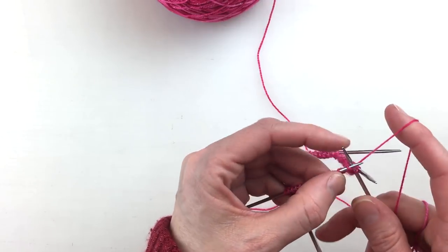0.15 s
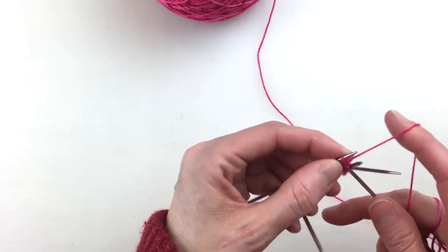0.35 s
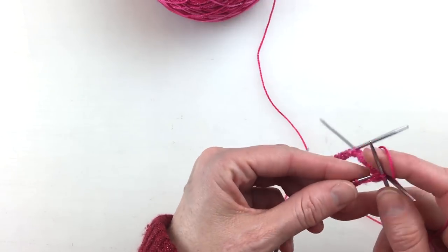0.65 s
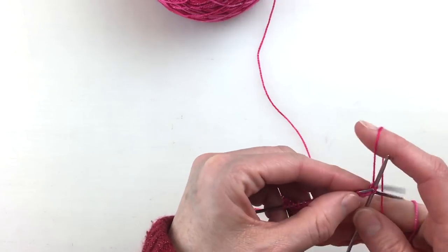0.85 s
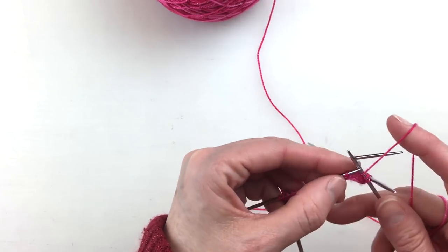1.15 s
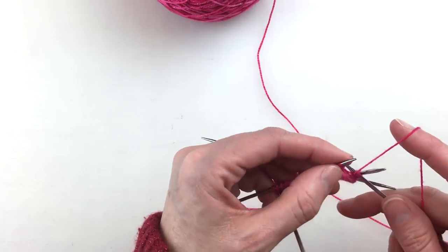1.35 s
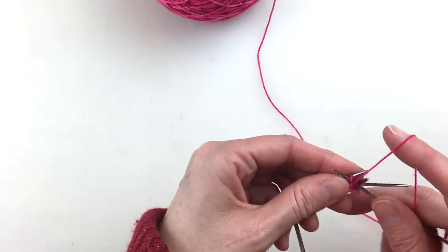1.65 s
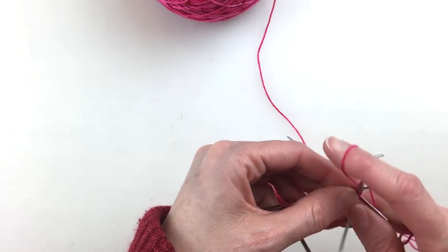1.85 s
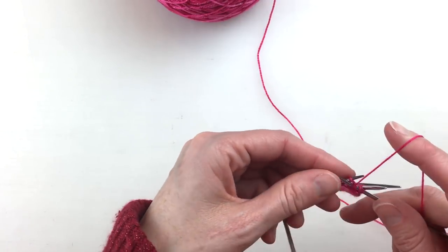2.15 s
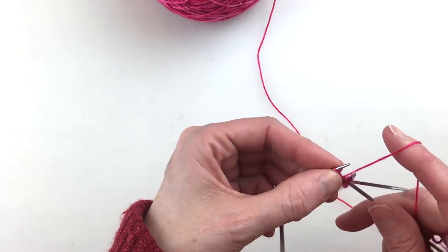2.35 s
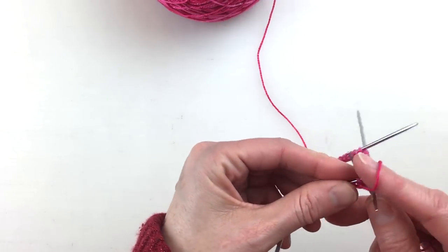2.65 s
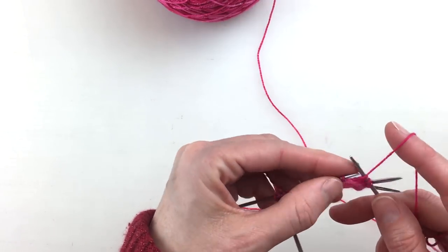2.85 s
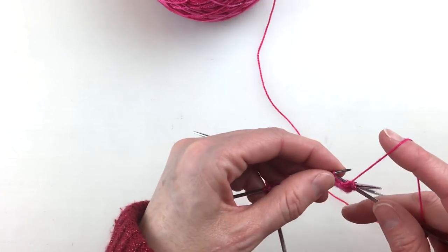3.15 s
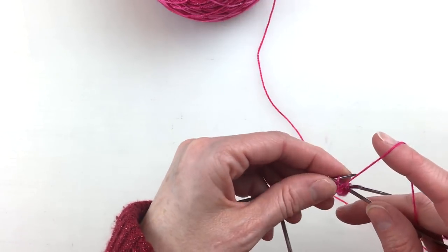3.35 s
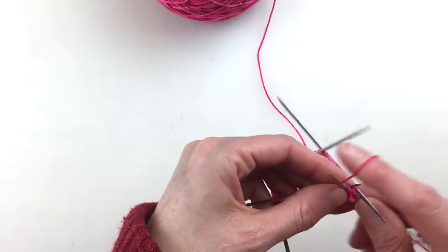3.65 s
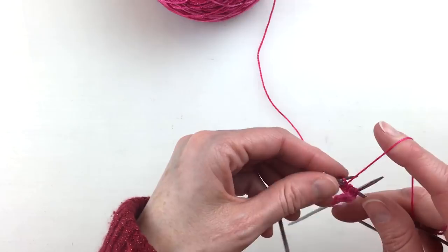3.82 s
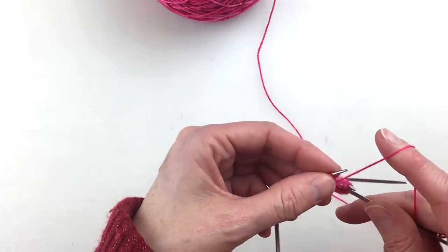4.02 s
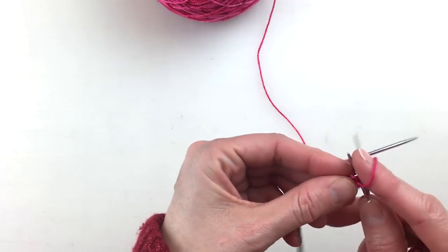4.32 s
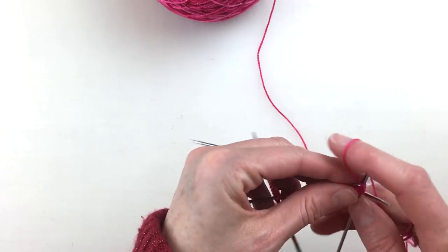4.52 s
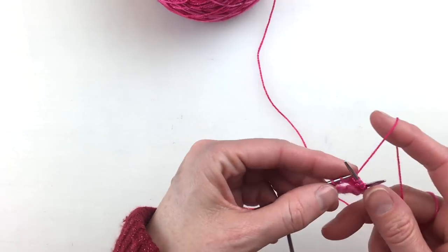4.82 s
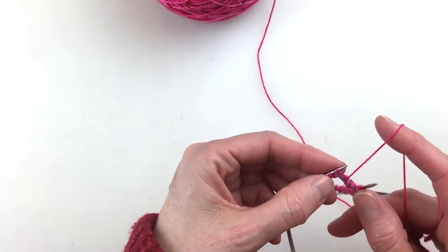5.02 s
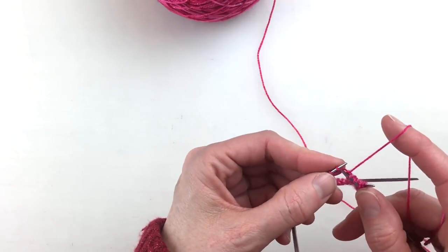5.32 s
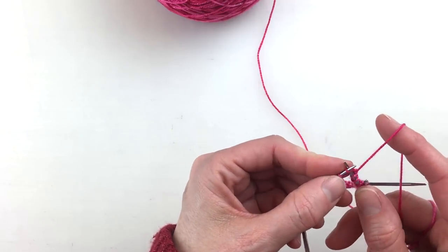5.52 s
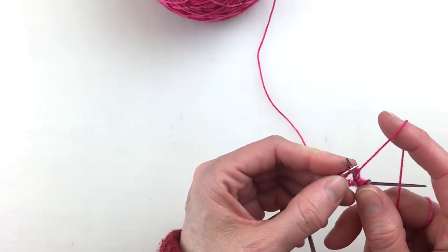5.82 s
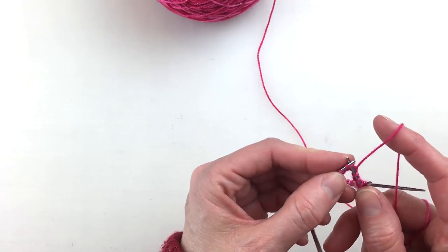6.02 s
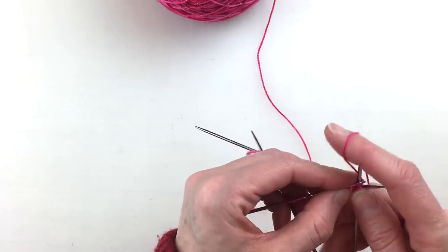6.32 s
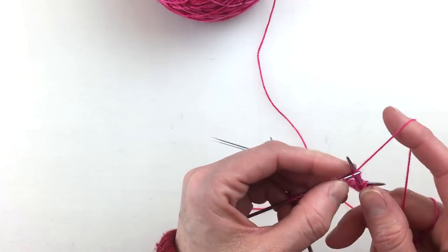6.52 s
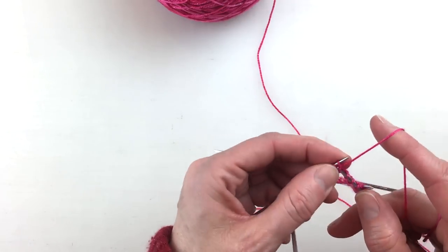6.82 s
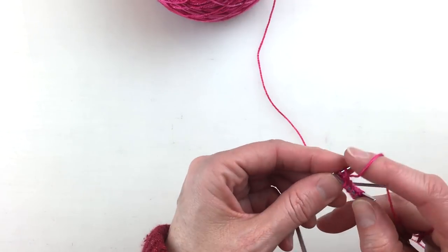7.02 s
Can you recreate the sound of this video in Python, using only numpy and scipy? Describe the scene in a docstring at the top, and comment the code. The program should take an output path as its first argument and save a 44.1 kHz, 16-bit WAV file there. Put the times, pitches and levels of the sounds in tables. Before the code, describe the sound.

A dull little hand brush starts it, then delicate metal needle taps and whispery wool strokes continue close to the microphone, with a very short room tail. A wavering low engine drone in the distance builds early, holds until about three seconds, then drops away, leaving a faint rumble and hiss. Clicks cluster just before three seconds and after four, thinning toward the end.

```python
"""A low hum over a soft rumble, like a distant engine going by: it swells, sinks in pitch, then fades as it creeps up.
Drones are wavering sines; rumble, roar and hiss are shaped noise. A hand's grip shifts in one dull brush at the start.
Up close, thin steel needles knit wool: yarn is pulled along the steel in short strokes of rustling noise.
The needles tap, some rebound, and noise bursts excite their bending modes: square contacts ring, glancing ones
give a dry tick. A loosely held needle rings on as a dying sine, and a short room tail follows."""
import sys
import numpy as np
from scipy import signal
from scipy.fft import rfft, irfft, next_fast_len
from scipy.io import wavfile
from scipy.ndimage import map_coordinates

SR = 44100
rng = np.random.default_rng(int(sys.argv[2]) if len(sys.argv) > 2 else 0)


def wav_out(sig):
    """Save sig, one row per channel (or a flat mono array), as 16-bit PCM at SR to the path in sys.argv[1]."""
    wavfile.write(sys.argv[1], SR, np.round(np.clip(np.atleast_2d(sig).T, -1, 1) * 32767).astype(np.int16))


N = 316197  # samples, about 7.17 s


def amp(db):
    """Amplitude factor of a level in dB."""
    return 10 ** (np.asarray(db) / 20)


def unit(x):
    """x at rms 1."""
    return x / np.sqrt(np.mean(x ** 2) + 1e-30)


def curves(rows):
    """One value per sample for each column after the time."""
    knots_s, *columns = np.transpose(rows)
    t = np.arange(N) / SR
    return [np.interp(t, knots_s, column) for column in columns]


def wobble(rate):
    """A smooth random curve, rate knots a second."""
    knots = rng.standard_normal(int(N * rate / SR) + 4)
    return map_coordinates(knots, [np.arange(N) * rate / SR])


def filtered(x, response):
    """x times a complex response of frequency."""
    m = next_fast_len(len(x) + 2048)  # zero padding leaves space for the filter's tail
    hz = np.fft.rfftfreq(m, 1 / SR)
    return irfft(rfft(x, m) * response(hz), m)[:len(x)]


def coloured(x, spectrum):
    """x shaped by (Hz, dB) points, at rms 1."""
    points_hz, points_db = np.transpose(spectrum)

    def colour(hz):
        return amp(np.interp(np.log(hz + 1), np.log(points_hz), points_db))

    return unit(filtered(x, colour))


def noise(spectrum):
    """Steady noise of that colour, at rms 1."""
    return coloured(rng.standard_normal(N), spectrum)


# colour of the faint even hiss: frequency_hz, density_db (per Hz, relative)
HISS_COLOUR = [(300, 1), (2000, 6), (2800, 1), (4000, 2.5), (4900, -2), (6000, 0), (9400, -3.5),
               (10500, -7.5), (12000, -3.5), (15700, -8)]


def hiss():
    """Steady shaped noise at the bottom of the mix."""
    return amp(-76.0) * noise(HISS_COLOUR)


def off_table(x, delay_s=0.00322, echo_db=-15):
    """Room sound arrives once more off the table top, which ripples its spectrum."""
    return filtered(x, lambda hz: 1 + amp(echo_db) * np.exp(-2j * np.pi * hz * delay_s))


# colour of the distant rumble: frequency_hz, density_db (per Hz, relative)
RUMBLE_COLOUR = [(15, -47.5), (29, -23.5), (42, -7), (55, -10.5), (67, -6.5), (85, -1), (102, 4), (135, -3),
                 (165, -6), (200, -7.5), (225, -15.5), (330, -27.5), (500, -53)]
# colour of the soft roar above it: frequency_hz, density_db (per Hz, relative)
ROAR_COLOUR = [(120, -9), (260, 4), (340, 2), (440, 1), (660, 0.5), (950, -2), (1300, -7.5), (1550, -8),
               (1850, -17.5), (2800, -33), (6000, -35.5)]
# level of the distant noise: time_s, rumble_db, roar_db
DISTANT_LEVELS = [(0, -53.5, -65.5), (.45, -57, -67), (1.3, -52, -63), (1.8, -56.5, -63.5),
                  (2.55, -50, -66.5), (3.15, -54, -63.5), (3.8, -56.5, -66.5), (4.8, -56, -68),
                  (5.9, -57.5, -68.5), (6.7, -59.5, -68.3), (7.17, -60, -69.3)]


def distant_noise():
    """A bed of low rumble and soft roar; the roar wavers slightly and is reflected by the table."""
    rumble_db, roar_db = curves(DISTANT_LEVELS)
    rumble = amp(rumble_db) * noise(RUMBLE_COLOUR)
    roar = amp(roar_db + 0.4 * wobble(8)) * unit(off_table(noise(ROAR_COLOUR)))
    return rumble + roar


def tone(hz, waver_db, drift_hz):
    """A sine of rms 1 that wavers in level and pitch on its long way through the air."""
    phase = 2 * np.pi * np.cumsum(hz + drift_hz * wobble(9)) / SR
    return unit(np.sin(phase) * amp(waver_db * wobble(14)))


# drones that come and go by themselves: time_s, low_db, middle_db, high_db
FREE_DRONE_LEVELS = [(0, -58, -72, -73), (.3, -63, -60.5, -73), (1.15, -61, -59, -77), (1.5, -59, -55, -56),
                     (2, -57, -68, -67.5), (2.4, -52.5, -69, -57), (3.3, -57.5, -84, -65),
                     (3.85, -64, -85, -74), (4.7, -58, -90, -69.5), (5.5, -63, -87, -71.5),
                     (6, -56.5, -93, -72.5), (6.5, -68, -80, -71), (7.17, -60, -84, -77)]


def free_drones():
    """Three wavering sines, each with its own level curve."""
    low_db, middle_db, high_db = curves(FREE_DRONE_LEVELS)
    low = amp(low_db) * tone(77.34, waver_db=1.5, drift_hz=2.52)
    middle = amp(middle_db) * tone(149, waver_db=1.5, drift_hz=0.99)
    high = amp(high_db) * tone(203.1, waver_db=0.3, drift_hz=1.77)
    return low + middle + high


# the engine's main note: time_s, pitch_hz
HUM_PITCH = [(0, 126), (1, 123.6), (2, 122), (3, 119.2), (4, 116.7), (5, 112.5), (5.7, 114.4),
             (7.17, 121.9)]
# the engine's strength, before a 2 dB trim of the main note: time_s, level_db
HUM_LEVEL = [(0, -48.5), (.2, -56), (.6, -48), (1.1, -42), (1.2, -39), (1.4, -40.5), (2.9, -39),
             (3.27, -47.5), (3.42, -43.5), (3.75, -48.5), (4.25, -52.5), (4.5, -50.5), (4.95, -53.5),
             (5.15, -59.5), (5.7, -57), (6.3, -64.5), (7.17, -60)]
# drones that rise and sink with the main note's level: pitch_hz, level_db (at the engine's loudest),
# follow_db_per_db (of the main note), waver_db (random both ways, so its sign is free), drift_hz
FOLLOWING_DRONES = [(58.8, -67.5, 0.35, -2.5, 1.5), (309.5, -75, 2, 1, 2)]


def engine_hum():
    """A main note that glides in pitch, with weaker drones that follow its level."""
    pitch_hz, = curves(HUM_PITCH)
    hum_db, = curves(HUM_LEVEL)
    fade_db = hum_db - hum_db.max()
    out = amp(hum_db - 2.0) * tone(pitch_hz, waver_db=0.7, drift_hz=.43)
    for hz, db, follow, waver_db, drift_hz in FOLLOWING_DRONES:
        out += amp(db + follow * fade_db) * tone(hz, waver_db, drift_hz)
    return out


def scuff(start_s=0.0021, length_s=0.09, db=-65):
    """A hand shifts its grip with one soft, dull brush: a quick swell and a slower fall of noise."""
    progress = np.clip((np.arange(N) / SR - start_s) / length_s, 0, 1)
    swell = np.sin(np.pi * np.sqrt(progress))
    # frequency_hz, density_db (per Hz, relative)
    return amp(db) * swell * noise([(300, -12), (1100, 3), (1800, -4), (2600, -18), (8000, -32)])


# the needles' bending modes: frequency_hz, width_hz, level_db, grip_share (of the grip shift, 0-1)
NEEDLE_MODES = [(2290, 110, 5, 0.16), (3570, 54, -9.5, 0.11), (5470, 150, 4, 0.88),
                (6020, 710, -11.5, 0.94), (7256, 110, -1.5, 0.16), (9170, 88, -9.5, 0.14),
                (9780, 130, -4.5, .2), (12380, 490, -8, 0.3), (14450, 290, -12, 0.26),
                (15560, 140, -4, 0.3)]


def steel(hz, grip_hz, scatter_hz):
    """Response of the needles; the grip and the changing point of support shift their modes."""
    response = 0
    for mode_hz, width_hz, db, share in NEEDLE_MODES:
        f = mode_hz + share * grip_hz + scatter_hz * rng.standard_normal()
        damping = 1j * hz * width_hz
        response = response + amp(db) * damping / (f * f - hz * hz + damping)
    return response


# pulls of yarn along the needles: peak_s, length_s, level_db (at the peak)
YARN_STROKES = [(0, 0.033, -69.5), (0.098, 0.1, -74), (.41, 0.033, -71), (0.478, 0.059, -72),
                (0.588, .08, -69.5), (.695, 0.12, -70.5), (.885, 0.087, -74.5), (1, .06, -72.5),
                (1.225, .08, -76), (1.438, .04, -75), (1.533, 0.055, -75), (1.8, 0.074, -71.5),
                (1.87, .07, -72.5), (2.05, 0.14, -71), (2.222, 0.059, -68.5), (2.402, 0.036, -70.5),
                (2.489, .04, -77), (2.695, 0.22, -75.5), (2.899, .14, -76), (3.543, 0.11, -73.5),
                (3.62, 0.079, -74.5), (3.787, 0.15, -73), (3.934, 0.049, -67.5), (4.14, 0.071, -71),
                (4.453, 0.14, -72), (4.616, .15, -73.5), (4.864, 0.28, -77.5), (5.979, 0.055, -80),
                (6.355, .08, -72), (6.464, 0.22, -78), (6.922, 0.17, -76.5)]


def sliding():
    """How hard the yarn rubs: each pull speeds up and slows down again."""
    rise_share, edge_db, shape = 0.46, 8, 1.6  # part spent speeding up, drop at the ends, roundness of the top
    t = np.arange(N) / SR
    power = np.full(N, amp(-88) ** 2)  # the wool never lies quite still
    for peak_s, length_s, db in YARN_STROKES:
        near = np.abs(t - peak_s) < 2 * length_s
        u = (t[near] - peak_s) / length_s
        away = np.maximum(-u / rise_share, u / (1 - rise_share))  # 0 at the peak, 1 at the ends
        power[near] += amp(db - edge_db * away ** shape) ** 2
    return np.sqrt(power)


# colour of the rubbing wool: frequency_hz, density_db (per Hz, relative)
WOOL_COLOUR = [(800, -35), (2200, -5.5), (3500, 1.5), (4900, -2), (5500, 1), (7000, 4), (7600, 0.5),
               (9200, 6), (10000, 2), (10500, -8), (11000, 3), (12200, 0), (13500, 2), (15600, -9.5)]


def yarn(catch_db=1.0, ring_db=-12, snag_db=-6, snags_per_s=160):
    """Fibres catch and slip in a fine rustle, which faintly rings the needles; some snag with a tiny tick."""
    fibres = rng.standard_normal(N) * amp(catch_db * wobble(700) + 2.3 * wobble(90))
    snags = unit((rng.random(N) < snags_per_s / SR) * rng.standard_normal(N))
    rustle = filtered(fibres + amp(snag_db) * snags, lambda hz: 1 + amp(ring_db) * steel(hz, 0, 0))
    return sliding() * coloured(rustle, WOOL_COLOUR)


# a loosely held needle rings on after a tap: start_s, pitch_hz, peak_db, t60_s
LOOSE_RINGS = [(.682, 2190, -60.5, 0.12), (.682, 3570, -67, 0.072), (.682, 5230, -67, .045),
               (1.7995, 3580, -66.5, 0.069), (2.9925, 5324, -65, .049), (4.1535, 2080, -54, .035),
               (4.445, 2100, -62, .04), (4.674, 5380, -66, .07), (5.9975, 4324, -64, 0.013),
               (6.916, 3600, -70, 0.07)]


def pings():
    """A needle that the fingers do not damp keeps its modes sounding as dying sines."""
    t = np.arange(SR // 8) / SR
    out = np.zeros(N + len(t))
    for start_s, hz, db, t60_s in LOOSE_RINGS:
        out[int(start_s * SR):][:len(t)] += amp(db - 60 * t / t60_s) * np.sin(2 * np.pi * hz * t)
    return out[:N]


# needle contacts: start_s, level_db (middle register, as if its energy filled 5 ms),
# top_db (top register relative to the middle), glancing (0 square - 1 glancing), chatter_t60_s,
# favoured_hz (strongest upper ring), grip_hz (shift of the modes), rebound (amplitude share, 0-1)
NEEDLE_TAPS = [(0.0872, -69.5, 0, 0.5, .026, 15400, 220, 0),
               (.4752, -62.5, -1, 0.24, 0.011, 15330, -110, .5),
               (0.6818, -58.5, 5.5, 0.45, 0.0047, 15100, -100, .35),
               (0.703, -68, 7, 0.4, .025, 15000, -40, 0), (.934, -63, 1, .1, 0.011, 12100, -70, 0.4),
               (1.0434, -65.5, 5.5, 0.3, 0.026, 9690, 140, 0.05),
               (1.106, -65.5, 3, .25, 0.018, 12300, -90, .4), (1.252, -65.5, 3.5, 1, 0.0037, 8700, -20, 0),
               (1.3005, -70, -3, 0.3, .026, 9780, 0, 0.07), (1.3762, -67, 9, .95, .0057, 12200, -20, 0),
               (1.4818, -74, 5, .3, .012, 12380, 190, 0), (1.599, -59.5, -9, 0.22, 0.022, 9480, 60, 0.83),
               (1.6679, -70, -6, .3, .012, 9070, 120, 0), (1.76, -59.5, -4, 0.3, 0.0074, 10000, 143, 0.06),
               (1.799, -72, 11, .6, .012, 12380, -170, 0), (2.0933, -67.5, -8, .25, 0.033, 8460, 130, 0),
               (2.246, -66.5, 2, 1, .0043, 9020, 150, 0.6), (2.4098, -63, -6, 0.02, 0.016, 9970, 170, 0),
               (2.5475, -56.5, -2, 0.22, 0.023, 9730, 130, 0), (2.69, -67, -12, 0.8, .02, 11930, -80, 0),
               (2.6996, -64, 4.5, .45, 0.02, 10210, 60, 0), (2.7166, -67, 3, 0.33, .026, 9800, 290, 0),
               (2.7265, -58, 5, 0, 0.02, 9600, 90, .55), (2.7368, -63.5, -1, 0, 0.051, 9500, 70, 0.02),
               (2.9922, -56, 4.5, 0, 0.0097, 11940, -150, 0), (3.019, -60.5, 2.5, 0, .022, 12870, 150, 0.6),
               (3.314, -62.5, 0, 0.25, .028, 12200, -90, 0.02),
               (3.4658, -65, -2, 0.12, 0.02, 12420, 240, 0.01),
               (3.8021, -69.5, 5, .8, 0.012, 14730, 144, 0.29),
               (3.8363, -56.5, 5.5, 0.16, .014, 12360, 0, 0.36),
               (3.9162, -61.5, 0, .6, 0.021, 12550, 50, 0), (4.0855, -71, -12, .4, .014, 15350, 170, 0.01),
               (4.153, -51, -2, 0.06, 0.014, 14450, 0, 0.1),
               (4.2963, -55.5, -3.5, .12, 0.015, 12400, 38, 0.22),
               (4.3943, -67, 1, 0.56, 0.016, 9090, -100, 0), (4.409, -74, 5, 0, 0.019, 9860, 220, .9),
               (4.444, -61.5, 5.5, 0, 0.023, 12000, 150, 0.67),
               (4.6733, -61.5, 0, 0.32, 0.019, 11830, -130, 0),
               (4.743, -69, 11.5, 0.83, 0.011, 9900, 100, 0.05),
               (4.787, -64.5, 5.5, 0.8, 0.018, 9200, 240, 0), (4.8374, -69.5, 10, .85, 0.028, 12640, 52, 0),
               (4.8766, -68.5, 7, 0.82, .011, 15570, 110, 0),
               (5.0854, -68.5, 9.5, .95, 0.0046, 11370, 110, 0),
               (5.1205, -72, -4, .15, 0.016, 15300, 190, 0.05),
               (5.161, -65, 9, 0.48, .015, 15600, 200, 0.24), (5.7264, -62, 1, 0.2, 0.014, 12400, 40, 0.12),
               (5.9969, -62.5, 2, 0.89, 0.0058, 8880, 140, 0), (6.3607, -65.5, 6, 0.13, .013, 10050, 73, 0),
               (6.452, -65.5, 3.5, 0.34, .027, 11980, 180, 0), (6.71, -67, 8.5, 1, .0048, 13740, 100, 0.02),
               (6.754, -70, 6, .7, 0.004, 12560, 340, 0.04), (6.9158, -72.5, 8, .35, .023, 12360, 110, .5)]


def contacts():
    """Every tap, and its weaker second landing 6.3 ms later if it bounces."""
    for start_s, db, *manner, rebound in NEEDLE_TAPS:
        yield start_s, db, *manner
        if rebound > 0:
            yield start_s + .0063, db + 20 * np.log10(rebound), *manner


def taps(snap_db=16.0, scatter_hz=50, favour_db=6, favour_width_hz=330):
    """Each contact is a snap and a dying chatter of steel on steel; where it lands decides which modes ring."""
    edges_hz = [(1850, 2650), (2900, 8500), (8500, 15700)]  # lowest mode, middle, top
    registers = [signal.butter(3, edges, 'band', fs=SR, output='sos') for edges in edges_hz]
    t = np.arange(SR // 20) / SR
    out = np.zeros(N + len(t))
    for start_s, db, top_db, glancing, t60_s, favoured_hz, grip_hz in contacts():
        # a square blow reaches the lowest mode, a glancing one is mostly dry crack
        low_db = np.interp(glancing, [0, 1], [-2.5, -22.5])
        crack_db = np.interp(glancing, [0, 1], [-22, 1.5])
        chatter = rng.standard_normal(len(t)) * amp(-60 * t / t60_s) * (1 - np.exp(-t / 0.00034))
        snap = amp(snap_db) * (t == 0)  # a single-sample impulse
        ring = filtered(chatter + snap, lambda hz: steel(hz, grip_hz, scatter_hz))

        def favour(hz):
            """The contact point drives one upper mode harder than the rest."""
            return 1 + amp(favour_db) / (1 + 2j * (hz - favoured_hz) / favour_width_hz)

        click = filtered(ring + amp(crack_db) * chatter, favour)
        for band, level_db in zip(registers, [low_db, 0, top_db]):
            # same energy as rms 1 held for 5 ms
            part = unit(signal.sosfilt(band, click)) * np.sqrt(.005 * SR / len(t))
            out[int(start_s * SR):][:len(t)] += amp(db + level_db) * part
    return out[:N]


def room(x, wet_db=-16, t60_s=0.13):
    """The table and the near walls answer with a short faint tail."""
    t = np.arange(SR // 4) / SR
    tail = rng.standard_normal(len(t)) * amp(-60 * t / t60_s) * (1 - np.exp(-t / 0.0012))
    return x + amp(wet_db) * signal.fftconvolve(x, tail / np.linalg.norm(tail))[:N]


def scene():
    """Hiss and a distant engine behind, needles and yarn up close."""
    background = hiss() + distant_noise() + free_drones() + engine_hum()
    needles = room(pings() + taps())
    return (background + scuff() + yarn() + needles)[None]


def record(dry):
    """The recorder keeps nothing above its band limit of 15950 Hz."""
    return np.array([filtered(x, lambda hz: hz < 15950) for x in dry])


dry = scene()
out = record(dry)
wav_out(out)
```